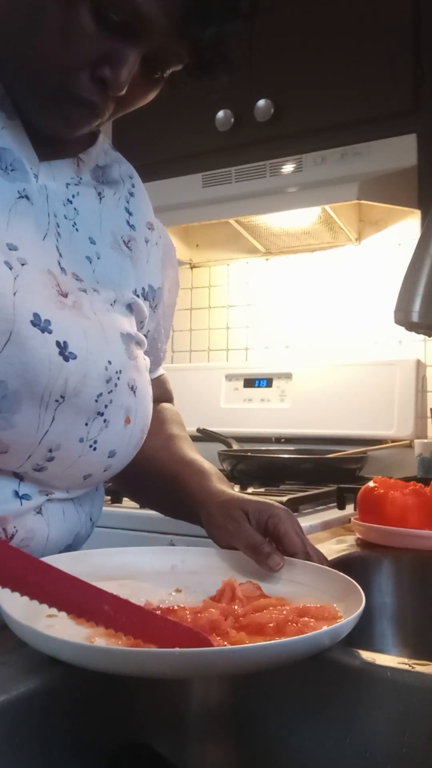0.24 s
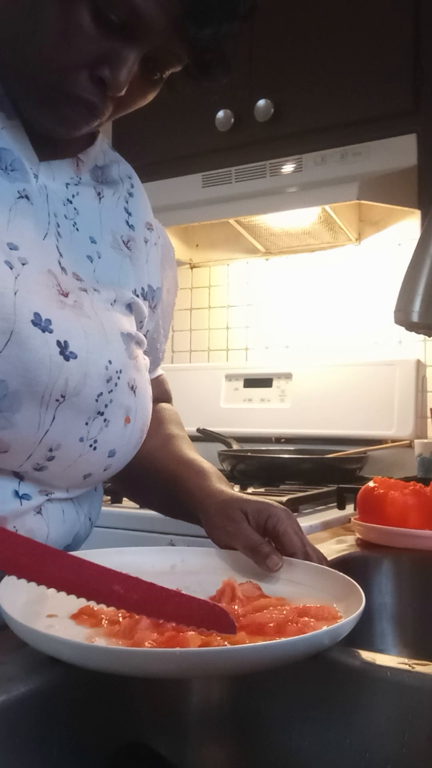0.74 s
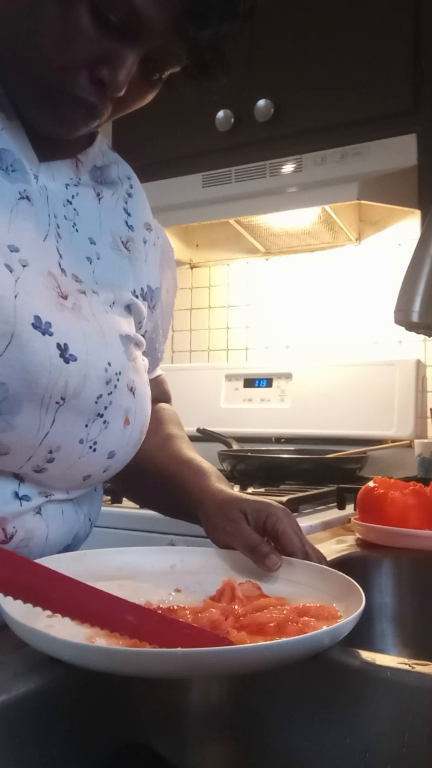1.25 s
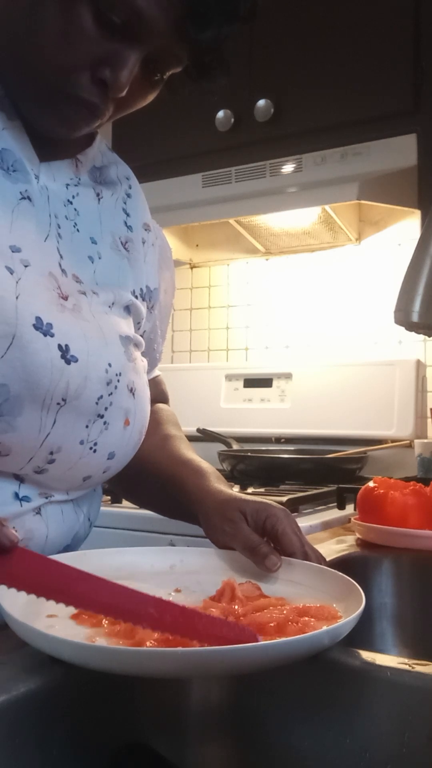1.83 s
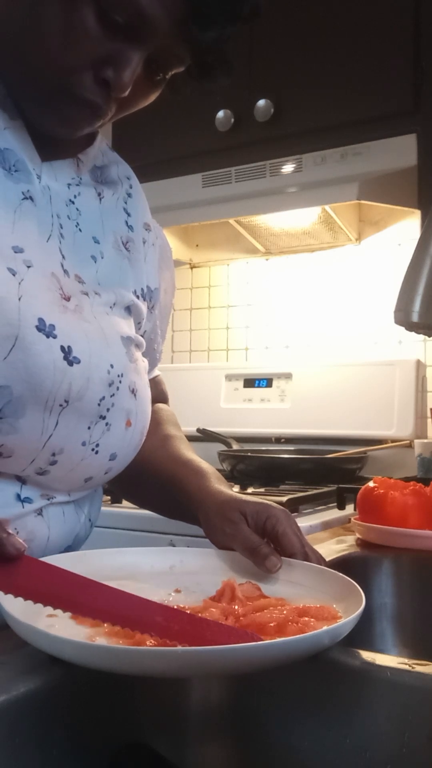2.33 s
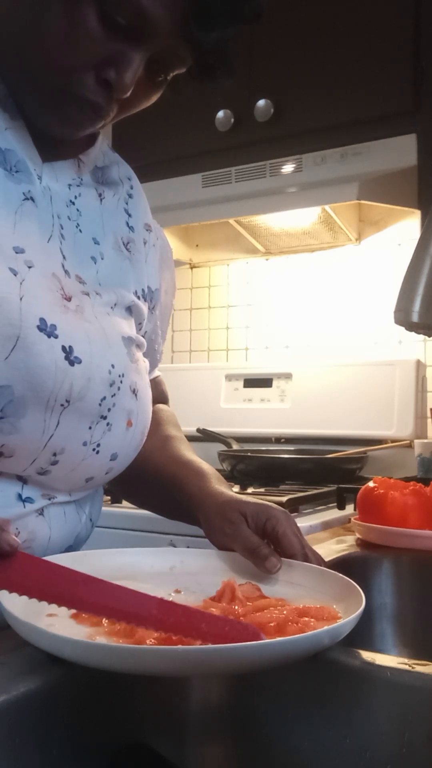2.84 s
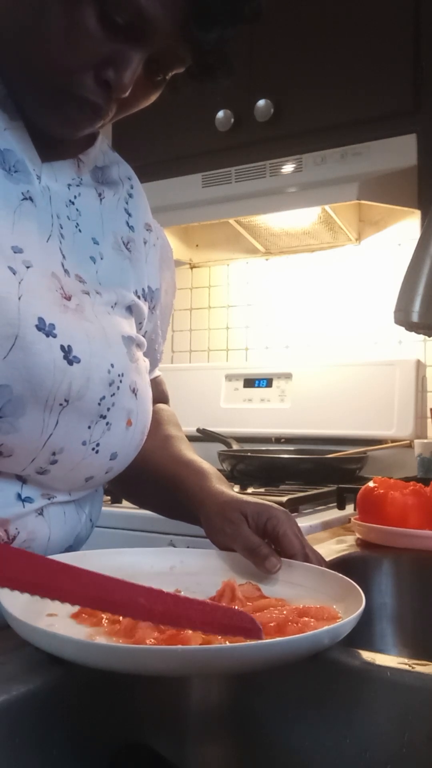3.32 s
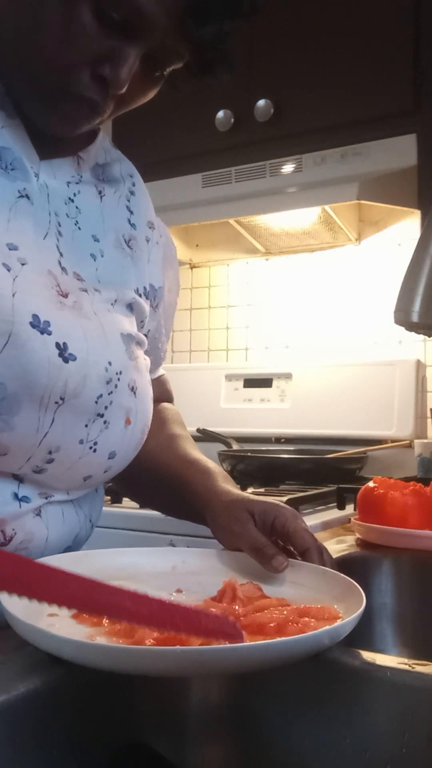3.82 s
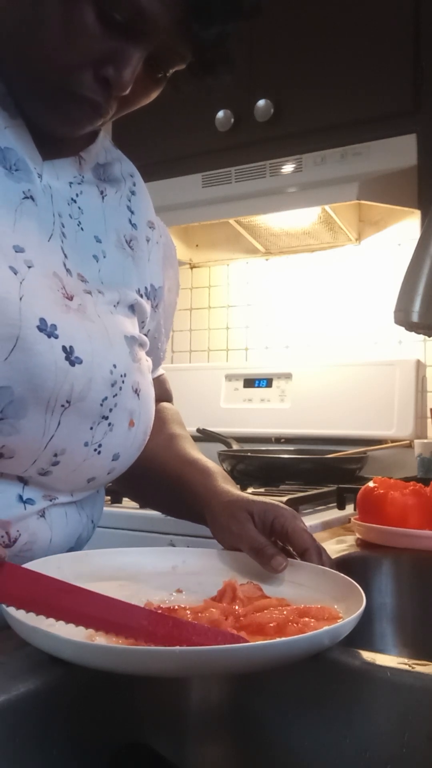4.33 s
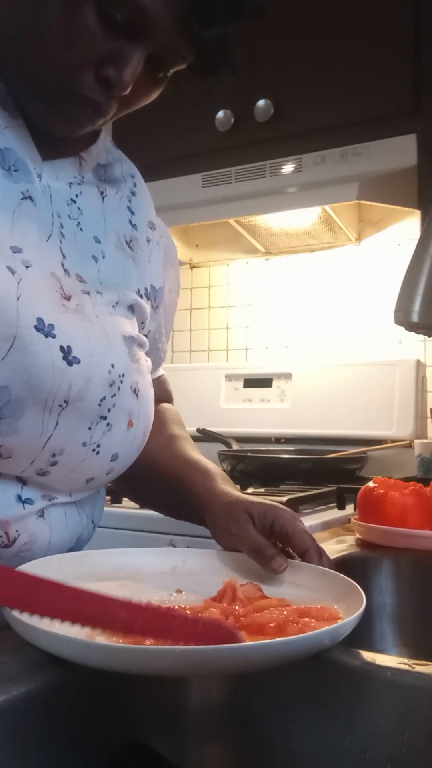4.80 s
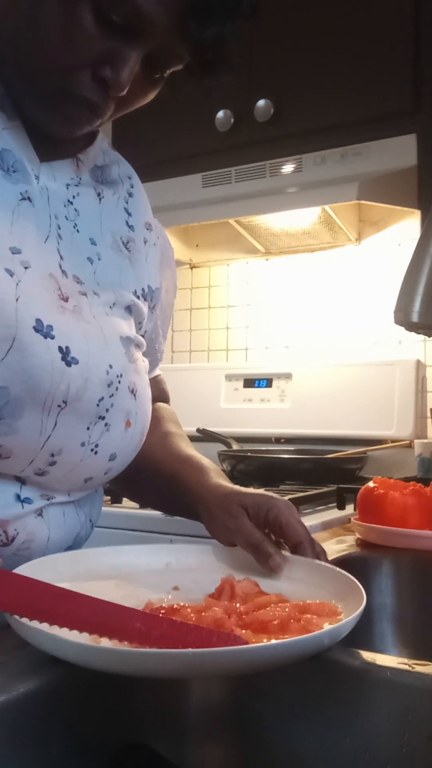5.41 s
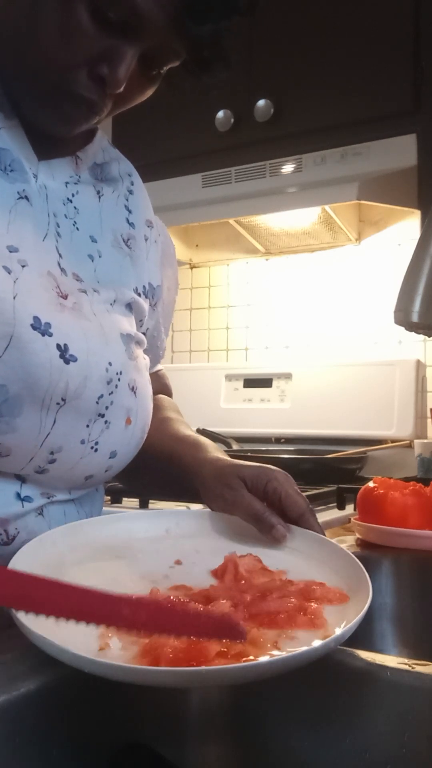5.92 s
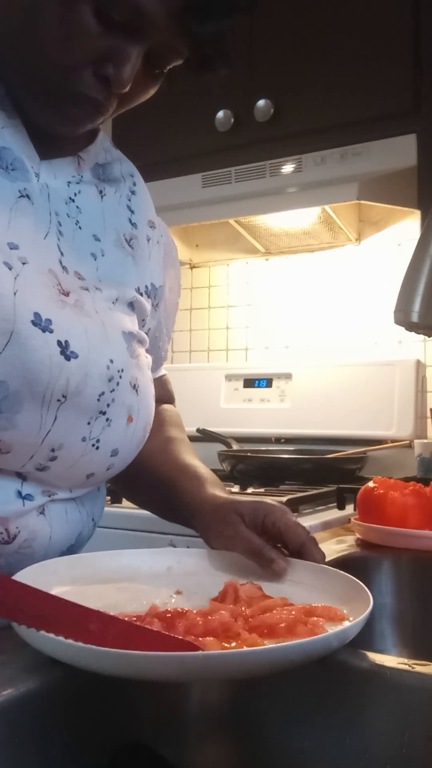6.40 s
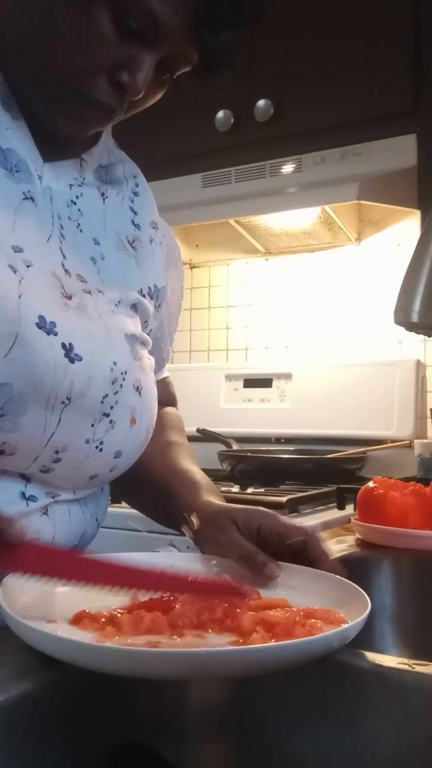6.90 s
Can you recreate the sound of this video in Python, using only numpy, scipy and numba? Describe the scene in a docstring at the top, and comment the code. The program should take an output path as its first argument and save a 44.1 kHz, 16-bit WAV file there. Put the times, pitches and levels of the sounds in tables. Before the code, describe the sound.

A serrated knife works through chopped tomato on a plate, heard close up in a quiet kitchen. In the first second it rubs softly, with small rough squeaks and groans on the glaze. The plate knocks lightly on the counter at about 1.2 and 2 seconds, and gritty, wet scrapes come from 1.6 to 2.5. After another knock near 3.1, the scraping becomes louder and nearly continuous from 3.3 to 6 seconds, with squelching pulp and sharp ticks of the teeth. More knocks fall in between, and brief squeaks come around 4.6 to 4.9. Stronger knocks at about 6.1, 6.5 and 6.9 seconds make the plate and counter rattle and ring briefly, followed by a last light scrape. Nearly everything is on the right; the covered left microphone gives little but faint hiss.

```python
"""Gritty, wet scraping, close up: a serrated knife pushes through chopped tomato on a plate.
The teeth catch, tick and squeak on the glaze while juice pops in the pulp. The plate knocks on the
kitchen counter so that both rattle and ring, and short pitched cracks sharpen some ticks and knocks.
The right microphone is open; the left one is covered and gets little but its own hiss and dull knocks."""
import sys
import numpy as np
from scipy import signal
from scipy.fft import rfft, irfft
from scipy.io import wavfile
from numba import njit

SR = 44100
rng = np.random.default_rng(int(sys.argv[2]) if len(sys.argv) > 2 else 0)


def pcm_store(signal):
    """Save signal as 16-bit PCM."""
    levels = np.round(np.clip(np.atleast_2d(signal), -1, 1) * 32767)
    wavfile.write(sys.argv[1], SR, levels.astype(np.int16).T)


N = 315315

# The plate knocking on the counter. Each row: start in seconds, boom in dB, then thud, ring and tick in
# dB above the boom, rattle length in seconds, thump in dB above the boom, boom and thud pitch in Hz.
KNOCKS = [(1.239, -36.5, -12.5, -4.5, -9, 0.12, -11, 740, 195),
          (2.046, -38, -12, -27, -27, 0.057, -17, 760, 235), (3.08, -37, -11, -8.5, -5, 0.07, -7, 450, 273),
          (4.244, -44, -19, -3, -29, 0.041, -5, 750, 196),
          (4.805, -38.5, -13.5, -22, -12, 0.12, 0, 450, 297),
          (5.341, -36.5, -34, -6, -4, 0.08, -22, 440, 232), (5.536, -32, -36, 1, 7.5, 0.011, 9, 513, 323),
          (6.1098, -30.5, -3, 4, 8.5, 0.085, 17, 390, 283),
          (6.501, -21.5, -5.5, -12.5, -18.5, 0.066, -6, 584, 189),
          (6.876, -21, -14, -2, -11, 0.054, 3, 580, 285)]
# Single teeth ticking on the glaze. Each row: start in seconds, level in dB, ring in dB above that.
TOOTH_TICKS = [(0.169, -51, -23), (0.378, -45, 15), (1.5938, -52, -26), (1.709, -24, -7), (2.453, -43, -11),
               (2.8496, -68, -8), (3.083, -56, 27.5), (3.2656, -46.5, 10), (3.3098, -21, -2),
               (3.38, -24, -11), (3.414, -21, -26), (3.449, -20, -25), (3.526, -24, -25), (3.608, -20, -12),
               (3.6705, -27, -25), (3.703, -30, -27), (3.717, -30, -27), (3.746, -37, -33),
               (3.751, -40, -23), (3.82, -37, -25), (3.836, -18, -13), (3.853, -21, -25), (3.897, -31, -25),
               (4.13, -25, -25), (4.266, -32, -29), (4.3344, -46, -27), (4.354, -21, -3.5),
               (4.401, -28, -25), (4.6927, -38, -23), (4.83, -39, 2), (4.905, -31, -23), (4.922, -25, -24),
               (4.935, -21, -25), (4.978, -33, -25), (5.183, -28, -20), (5.208, -24, -3), (5.244, -36, -27),
               (5.278, -35, -23), (5.31, -26, -25), (5.316, -24, -25), (5.438, -20.5, 1.5),
               (5.533, -27, -25), (5.611, -26, -25), (5.634, -22, -25), (5.7489, -22, -19), (5.9, -42, -35),
               (6.178, -34, -25), (6.209, -35, -25), (6.304, -43, -28), (6.312, -35, -30),
               (6.357, -29, -44), (6.637, -45, -5), (6.6704, -37, -13), (6.8114, -45, -12),
               (6.8795, -19, -2.5), (6.9547, -36, -20), (7.0044, -49, -8), (7.1043, -68, -41)]


def from_db(db):
    """Decibels to gain."""
    return 10 ** (np.asarray(db) / 20)


def rms_one(x):
    """Scale to rms 1."""
    return x / np.sqrt(np.mean(x ** 2) + 1e-20)


def cut(x, hz, kind, order):
    """Butterworth filter; kind names the part that passes."""
    return signal.sosfilt(signal.butter(order, hz, kind, fs=SR, output="sos"), x)


def band(x, low_hz, high_hz):
    """Gentle band-pass."""
    return cut(x, [low_hz, high_hz], "band", 2)


def colour(x, spectrum):
    """Minimum-phase filter of unit energy that follows rows of Hz and dB."""
    hz, level_db = np.transpose(spectrum)
    size = 2 ** 13
    grid = np.maximum(np.arange(size // 2 + 1), 1) * SR / size
    curve_db = np.interp(np.log(grid), np.log(hz), level_db)
    cepstrum = irfft(np.log(from_db(curve_db)))
    cepstrum[1:size // 2] *= 2
    cepstrum[size // 2 + 1:] = 0
    response = irfft(np.exp(rfft(cepstrum)))
    return signal.fftconvolve(x, response / np.sqrt(np.sum(response ** 2)))[:N]


def ring(force, hz, t60):
    """One mode: a unit click sets off a dying sine of height 1."""
    r, w = from_db(-60 / (max(t60, .01) * SR)), 2 * np.pi * hz / SR
    return signal.lfilter([0, np.sin(w)], [1, -2 * r * np.cos(w), r * r], force + 1e-18)


@njit
def sweep(x, hz, width_hz):
    """Resonance of gain 1 whose centre moves."""
    y, r = np.zeros(len(x)), np.exp(-np.pi * width_hz / SR)
    for i in range(2, len(x)):
        feedback = 2 * r * np.cos(2 * np.pi * hz[i] / SR) * y[i - 1] - r * r * y[i - 2]
        y[i] = (1 - r * r) / 2 * (x[i] - x[i - 2]) + feedback
    return y


def drift(hz):
    """Smooth random wander of rms 1."""
    r = np.exp(-2 * np.pi * hz / SR)
    return rms_one(signal.lfilter([1], [1, -2 * r, r * r], rng.standard_normal(N + SR))[SR:])


def grains(per_s, spread_db):
    """Random clicks of uneven size and sign."""
    sizes = from_db(spread_db * np.minimum(rng.exponential(1, N), 4)) * rng.choice([-1, 1], N)
    return rms_one(sizes * (rng.random(N) < per_s / SR))


def flicker(x, low_hz, depth_db, bands):
    """Quarter-octave bands from low_hz up each swell and fade on their own."""
    edges = low_hz * 2 ** (np.arange(bands + 1) / 4)
    return x + sum(band(x, low, high) * (from_db(depth_db * drift(21.5)) - 1)
                   for low, high in zip(edges, edges[1:]))


def room_tone():
    """A faint, low bed of noise that wavers slowly."""
    # The quiet kitchen's spectrum. Each row: frequency in Hz, level in dB.
    spectrum = [(18, -49), (30, 8), (127, 4.5), (199, -4), (258, 2.5), (403, -14.5), (538, -2.5),
                (614, -9.5), (718, -19), (777, -8.5), (841, -7), (1500, -22.5), (6020, -20.5), (8250, -32),
                (15900, -49)]
    return from_db(-72.5) * colour(rng.standard_normal(N), spectrum) * from_db(0.69 * drift(0.86))


def covered_hiss():
    """The covered microphone's own steady noise."""
    # The colour of the hiss. Each row: frequency in Hz, level in dB.
    spectrum = [(20, -30), (45, -0.5), (70, -1.5), (130, -1.5), (250, -7), (500, -10.5), (1000, -15),
                (3000, -17.5), (6200, -19.5), (8000, -31), (10500, -31), (13600, -27.5), (15000, -22.5),
                (16000, -25)]
    return from_db(-80) * colour(rng.standard_normal(N), spectrum)


def tooth_friction():
    """Teeth catch in clumps over a smooth wet slide; every few ms others sing at another pitch."""
    smooth_share = .8
    catches = grains(per_s=2500 * from_db(1.5 * drift(40)), spread_db=3.5)
    pitches_hz = 1500 * 2 ** rng.uniform(0, 2.93, N)
    tooth = np.cumsum(rng.random(N) < 150 / SR)
    singing = rms_one(sweep(catches, pitches_hz[tooth], width_hz=880))
    slide = np.sqrt(smooth_share) * rng.standard_normal(N)
    friction = slide + np.sqrt(1 - smooth_share) * catches + from_db(-13.5) * singing
    return friction * from_db(1.1 * drift(60))


def blade_strokes():
    """Each push swells, holds and dies as the blade lifts. Gives four gain curves and two pitch curves."""
    # Pushes of the blade. Each row: time of full bite, rise and hold in seconds, grit in dB, sag over
    # the hold in dB, then plate ring, counter boom and sheen in dB above the grit, squelch pitch and
    # rubbing pitch in Hz.
    pushes = [ (0.005, 0.012, 0.2, -73, 7, -2.5, -25.5, 4, 4800, 396),
              (0.17, 0.015, 0.042, -61, 18, -20, -6, -38, 3470, 473),
              (0.308, 0.12, 0.06, -78.5, -8.5, -10, 20.5, 12, 4500, 300),
              (0.389, 0.028, 0.12, -56, 5, 7, -13, 9.5, 3500, 575),
              (0.565, 0.12, 0.047, -72, -1, -10, 17, 19, 5340, 516),
              (0.66, 0.035, 0.1, -88, -12, -17, 8, -2, 4880, 507),
              (0.74, 0.027, 0.051, -59, -5.5, -20, 1.5, -15, 4030, 530),
              (1.252, 0.021, 0.018, -57, -5.5, 6.5, 4, -20, 4170, 455),
              (1.45, 0.2, 0.074, -78.5, -3, -18, 11.5, -10, 5700, 455),
              (1.595, 0.0097, 0.084, -43, 0, -11.5, -10, 7.5, 4950, 542),
              (1.726, 0.038, 0.11, -38.5, 7.5, 1, -7, 11.5, 4850, 590),
              (1.867, 0.029, 0.035, -49, 0, 0, -33, 13.5, 5170, 810),
              (1.969, 0.056, 0.066, -43, 16.5, -3.5, -28, 7.5, 4960, 780),
              (2.094, 0.083, 0.097, -48, -5, -3, -3.5, -3, 5350, 534),
              (2.216, 0.041, 0.1, -47.5, 9, 3, -24, 4.5, 3970, 582),
              (2.307, 0.018, 0.056, -49, 7.5, -1, -17, -49, 3480, 664),
              (2.452, 0.0043, 0.15, -59.5, 16.5, -23, 0, -19, 2970, 583),
              (2.616, 0.038, 0.057, -76.5, 12, -15, 17, 5, 3010, 587),
              (2.852, 0.0079, 0.05, -69, 9, 8.5, -19, 10.5, 3230, 640),
              (3.267, 0.024, 0.016, -72, -5.5, 7, 29.5, -3, 4960, 544),
              (3.267, 0.003, 0.02, -53.5, 1, 4, -12, -3, 5100, 534),
              (3.32, 0.024, 0.029, -36.5, -3, -1, -5.5, 7, 4820, 522),
              (3.38, 0.012, 0.09, -31, -3, -8.5, -16.5, 5, 4710, 530),
              (3.499, 0.043, 0.19, -36, 5, -5, -14.5, 8, 4480, 557),
              (3.703, 0.015, 0.18, -33.5, 5, -24, -53, 8.5, 5260, 680),
              (3.884, 0.0255, 0.071, -39, -6, -5.5, -46, 4.5, 4450, 690),
              (4.019, 0.11, 0.14, -38.5, 3, -1, -24, 5, 4700, 660),
              (4.248, 0.098, .02, -49, 7, -7, -19, 4, 4750, 600),
              (4.264, 0.004, 0.14, -35.5, 1, -14, -17, 2.5, 4760, 545),
              (4.426, 0.09, 0.062, -39.5, 1.5, -1, -9, 1, 4730, 768),
              (4.528, 0.067, 0.1, -42, 8, -1, -15, 4.5, 5000, 684),
              (4.691, 0.0042, 0.068, -53.5, 8, -25, 3.5, -7, 4280, 490),
              (4.858, 0.12, 0.017, -60.5, 18, 8, 17.5, 5, 4530, 545),
              (4.951, 0.084, 0.09, -33.5, 1, -7, -17, 9, 5730, 550),
              (5.077, 0.052, 0.1, -43.5, 14.5, 7.5, -4, 12.5, 4080, 700),
              (5.153, .02, 0.028, -42.5, -3.5, -3, -20, 8, 2300, 770),
              (5.188, 0.0059, 0.019, -36, -1, -11, -19, 2, 4500, 770),
              (5.204, 0.0032, 0.15, -31, 8, -6, -28, 2.5, 4100, 510),
              (5.363, 0.011, 0.043, -35, 10, -17, -25, 11.5, 6030, 480),
              (5.389, 0.017, 0.11, -44, -5.5, 2.5, 0.5, -11, 4900, 487),
              (5.509, 0.12, 0.056, -43, -9, 4.5, -16, 7.5, 3940, 543),
              (5.61, 0.037, 0.078, -34, 2, 0.5, -8, 0.5, 4500, 576),
              (5.75, 0.036, 0.088, -44.5, -5.5, 2, -1.5, 3.5, 3860, 785),
              (5.899, 0.0051, 0.11, -46, 11, -38, -32, 1, 5570, 705),
              (5.963, 0.013, 0.3, -52.5, 2.5, -11, -9.5, 3, 3600, 757),
              (6.3084, 0.004, 0.048, -45.5, 15, -7, -9, 13.5, 5440, 352),
              (6.358, .002, 0.15, -44, 25, -15, -41, 0, 4530, 550),
              (6.623, 0.035, 0.074, -59, 22, -25, 15.5, -1, 4500, 534),
              (6.666, 0.0045, 0.14, -60, 24, -2, -2, 3, 3500, 487),
              (6.815, 0.0018, 0.052, -57.5, 7, -25, -14, 5.5, 5130, 333),
              (6.943, 0.029, 0.017, -37, 18, 9, -1, -11, 2740, 457),
              (6.96, 0.024, 0.016, -52, 19, -20, 17, 26.5, 2900, 466),
              (6.998, 0.062, 0.061, -55.5, 19, -22, 21.5, 15, 4770, 443),
              (7.1, 0.097, 0.082, -66, 5, -7, 3, 7, 5200, 390)]
    touch_s, release_db_per_s = .015, 456
    t, power, pitch = np.arange(N) / SR, np.zeros((4, N)), np.zeros((2, N))
    for s, rise_s, hold_s, grit_db, sag_db, ring_db, boom_db, sheen_db, squelch_hz, rub_hz in pushes:
        rise_s = max(rise_s, .002)
        span = slice(max(round((s - rise_s - touch_s) * SR), 0), round((s + hold_s + .2) * SR))
        push_db = np.interp(t[span] - s, [-rise_s - touch_s, -rise_s, 0, hold_s, hold_s + 1],
                            [-34.5, -11.5, 0, -sag_db, -sag_db - release_db_per_s])
        layer_db = grit_db + np.array([[0], [ring_db], [boom_db], [sheen_db]])
        power[:, span] += from_db(layer_db + push_db) ** 2
        pitch[:, max(round((s - rise_s / 2) * SR), 0):] = [[squelch_hz], [rub_hz]]
    wander_octaves = np.array([0.23 * drift(4.6), .06 * drift(9.2)])
    return np.sqrt(power), pitch * 2 ** wander_octaves


def squelch(hz):
    """Pockets of juice burst and ring for a few cycles."""
    return rms_one(sweep(grains(per_s=440, spread_db=1.8), hz, width_hz=350))


def scrape(grit, sheen, crackle):
    """Steel on glaze: flickering grit with a sheen on top, plus the bright edge of ticks and knocks."""
    # The colour of the scrape. Each row: frequency in Hz, level in dB.
    spectrum = [(530, -33), (900, -16.5), (1040, -9.5), (1340, -11), (2330, -6.5), (2850, -7), (3180, -4),
                (3460, -4), (6540, 0.5), (8210, -18), (13600, -26), (15000, -25.5), (15900, -6.5)]
    crossover_hz = 7390
    lower = flicker(cut(grit, crossover_hz, "low", 4), low_hz=1522, depth_db=2.5, bands=9)
    shimmer = sheen * from_db(2.15 * drift(33.3))
    upper = flicker(cut(shimmer, crossover_hz, "high", 4), low_hz=7200, depth_db=3, bands=4)
    edge = from_db(-11) * blows(6000) * crackle + tooth_snaps()
    return colour(lower + upper + edge, spectrum)


def plate(rub_ring, rub_boom):
    """Plate and counter ring together, rubbed by the blade and rattled by the blows."""
    # Their modes. Each row: pitch in Hz, level in dB, time to die by 60 dB in seconds.
    modes = [(75.1, -17, 0.53), (107, -11, 0.17), (140, -18.5, 0.041), (169.6, -8, 0.13),
             (205.1, 2.5, 0.24), (276, -2.5, 0.17), (308, -1, 0.049), (390, -11.5, 0.06),
             (462, -2.5, 0.084), (566.4, 4, 0.059), (669, -1.5, 0.055), (703, -5, 0.0068), (780, -5, 0.11),
             (855, -14.5, 0.039), (950, -3, 0.0093), (1050, -4.5, 0.036), (1136, -2.5, 0.013),
             (1261, -9.5, 0.094), (1415, -9, 0.18), (1746, 2.5, 0.0054), (2010, -7, 0.01),
             (2127, -8, 0.058), (2345, -4, 0.048), (2640, -1.5, 0.021), (2950, -6, 0.04), (3204, 4, 0.019),
             (3600, -5.5, 0.015), (3960, 7.5, 0.01), (4500, 1, 0.028), (5340, 7, 0.011), (6200, 3, 0.011)]
    pressed_share = 0.68  # ringing time left under the pressing blade
    rubs = [from_db(-42.5) * rub_boom, from_db(-46) * rub_boom, from_db(-35.5) * rub_ring]
    rubs = band(rubs, 297, 3560)
    out, rattle = np.zeros(N), grains(per_s=1100, spread_db=3.3)
    for hz, level_db, t60 in modes:
        register = np.searchsorted([330, 1000], hz)  # thud, boom, ring
        struck = from_db([-36, -40, -43][register]) * blows(hz) * np.roll(rattle, rng.integers(N))
        struck += (register == 2) * clacks()
        out += from_db(level_db) * ring(struck, hz, t60)
        out += from_db(level_db) * ring(rubs[register], hz, t60 * pressed_share)
    return out


def damped_plate(rub_ring, rub_boom, crackle):
    """Pulp and hand damp the plate, smearing part of its ring into two broad bands."""
    bright = from_db(-2.5) * rub_ring + from_db(-8) * blows(2000) * crackle
    hollow = from_db(-1.5) * rub_boom + from_db(0.5) * blows(460) * crackle
    return band(bright, 780, 3050) + band(hollow, 370, 1147)


def dry_rubs():
    """Rubs on bare glaze swell and fade, each making the plate sing around a favoured pitch."""
    # The rubs. Each row: start and length in seconds, attack as a share of the length, level in dB,
    # favoured pitch in Hz, fall-off around it in dB per octave.
    rubs = [(0.157, 0.12, 0.097, -55, 3600, 14.5), (0.247, .075, 0.27, -44.5, 290, 22),
            (0.358, 0.17, 0.23, -41, 800, 4), (0.373, 0.16, 0.4, -52.5, 455, 30),
            (0.479, 0.22, 0.098, -51, 563, 53), (0.641, 0.19, 0.66, -48, 545, 46),
            (0.718, 0.054, 0.24, -46.5, 770, 40), (0.721, 0.1, 0.35, -53, 2540, 4),
            (2.446, 0.16, 0.023, -49.5, 2950, 53), (2.448, 0.043, 0.051, -54.5, 1300, 40),
            (4.77, .16, 0.44, -44, 497, 26), (5.206, 0.047, 0.18, -29.5, 3680, 18),
            (5.78, .09, 0.32, -50, 780, 35), (5.901, 0.04, .25, -41.5, 4900, 30),
            (5.974, 0.053, 0.21, -39, 1700, 32), (5.979, 0.047, 0.25, -40, 3160, 31),
            (6.36, .06, 0.083, -45, 4150, 30), (6.887, 0.09, 0.062, -36, 2300, 6.5)]
    # Where the rubbed plate sings. Each row: centre and width in Hz, level in dB.
    glaze_bands = [(243, 40, -9.5), (290, 50, -13), (455, 13, -1), (550, 19, -8.5), (770, 20, -11.5),
                   (800, 12, -7), (947, 26, -14), (1180, 21, -9.5), (1300, 54, -12), (1674, 120, -10.5),
                   (2064, 22, -16.5), (2300, 22, -11.5), (2700, 45, -15.5), (2900, 64, -10.5),
                   (3160, 77, -9.5), (3530, 41, -12.5), (3840, 63, -10.5), (4110, 46, -10.5),
                   (4500, 45, -12.5), (4900, 31, -5.5), (5260, 40, -8), (5730, 70, -7), (5910, 35, -7),
                   (6100, 32, -16), (6960, 51, -12)]
    out = np.zeros(N)
    for hz, width_hz, band_db in glaze_bands:
        force = np.zeros(N + SR)
        for s, length_s, attack, level_db, favoured_hz, fall_db in rubs:
            progress = np.linspace(0, 1, round(length_s * SR))
            swell = np.interp(progress, [0, attack, 1], [0, 1, 0])
            gain = from_db(level_db + band_db - abs(fall_db * np.log2(hz / favoured_hz)))
            force[round(s * SR):][:len(swell)] += gain * swell * rng.standard_normal(len(swell))
        out += sweep(force[:N], np.full(N, float(hz)), width_hz) * np.sqrt(SR / width_hz / np.pi)
    return out


def tooth_snaps():
    """Each tick of a tooth opens with one hard, bright snap."""
    out = np.zeros(N)
    for s, tick_db, _ in TOOTH_TICKS:
        out[round(s * SR)] = from_db(tick_db + 4)
    return cut(out, 3500, "high", 2)


def blows(hz):
    """Envelope of the blows at one pitch: knocks hit and rattle away; teeth add spikes above 1 kHz."""
    hit_s, tooth_s, fall_db_per_octave = 0.013, .004, 3.5
    strength, age = np.zeros(N + SR), np.arange(SR // 4) / SR
    hit = from_db(-0.5) * np.exp(-age / hit_s)
    register = np.searchsorted([330, 1000, 4000], hz)  # thud, boom, ring, tick
    rise_s = 0.0029 if register == 0 else 0.0049
    rise = 1 - np.exp(-age / rise_s)
    for s, boom_db, thud_db, ring_db, tick_db, rattle_s, _, boom_hz, thud_hz in KNOCKS:
        # where the plate is struck decides which low modes are favoured
        octaves_off = abs(np.log2(hz / [thud_hz, boom_hz, hz, hz][register]))
        level_db = boom_db + [thud_db, 0, ring_db, tick_db][register] - fall_db_per_octave * octaves_off
        rattle = rise * np.exp(-(age / rattle_s) ** 2)
        strength[round(s * SR):][:len(age)] += from_db(level_db) * (hit + rattle)
    if register >= 2:
        for s, tick_db, ring_db in TOOTH_TICKS:
            level_db = tick_db + (ring_db + 0.5 if register == 2 else 5)
            strength[round(s * SR):][:len(age)] += from_db(level_db) * np.exp(-age / tooth_s)
    return strength[:N]


def squeaks():
    """Blade and plate slip with rough squeaks and groans: friction noise in a narrow gliding band."""
    # The slips. Each row: start and length in seconds, level in dB, first and last pitch in Hz.
    slips = [(0.248, .06, -56, 259, 298), (0.57, 0.074, -57, 440, 540), (0.64, .07, -62, 583, 480),
             (0.698, 0.066, -55.5, 390, 394), (0.76, 0.061, -59, 2150, 2100),
             (4.577, 0.081, -50.5, 1740, 1940), (4.723, 0.044, -57, 1050, 900),
             (4.788, 0.13, -51.5, 963, 1160)]
    out, friction = np.zeros(N), rng.standard_normal(N)
    for s, length_s, level_db, from_hz, to_hz in slips:
        progress = np.linspace(0, 1, round(length_s * SR))
        span = slice(round(s * SR), round(s * SR) + len(progress))
        tone = sweep(friction[span], from_hz + (to_hz - from_hz) * progress, width_hz=.04 * from_hz)
        out[span] += from_db(level_db - 3) * np.sin(np.pi * progress) * rms_one(tone)
    return out


def clacks():
    """The hard edge of each knock: one click of random strength to drive an upper mode."""
    out = np.zeros(N)
    for s, boom_db, _, ring_db, *_ in KNOCKS:
        out[round(s * SR)] = from_db(boom_db + ring_db - 16) * rng.standard_normal()
    return out


def thumps():
    """The soft first contact of each knock: a few swelling and dying cycles at its boom pitch."""
    swell_s = 0.0014
    out, age = np.zeros(N + SR), np.arange(SR // 10) / SR
    swell = age / swell_s * np.exp(1 - age / swell_s)
    for s, boom_db, *_, thump_db, boom_hz, _ in KNOCKS:
        thump = swell * np.sin(2 * np.pi * boom_hz * age)
        out[round(s * SR):][:len(age)] += from_db(boom_db + thump_db - 6) * thump
    return band(out[:N], 220, 2800)


def after_ring():
    """Notes of plate and counter linger after a knock, wavering and fading ever faster."""
    # The lingering notes. Each row: pitch in Hz, time to die by 60 dB and swell time in seconds.
    notes = [(130.6, 0.52, 0.041), (202.95, 0.44, 0.028), (239.4, 0.26, 0.011), (266, 0.56, 0.0078),
             (456, 0.37, 0.0072), (545, 0.19, 0.008), (571, 0.25, 0.0097), (600, 0.2, 0.0022),
             (660, 0.18, 0.0035), (763, 0.34, 0.0019), (794, 0.27, 0.0019), (860, 0.072, 0.0017),
             (1064, 0.071, 0.004), (1205, 0.23, 0.0041)]
    # Where the plate is struck sets each note's strength. Each row: start in seconds, factor on the
    # ringing time, then the level of each note in dB.
    strikes = [(1.243, 0.81, -47, -49, -54, -55, -60, -68, -57, -53, -60, -47, -41.5, -71, -70, -54),
               (2.05, 1.4, -72, -55, -54.5, -73, -53, -51.5, -54, -54, -66, -56, -48, -67, -68, -59),
               (3.082, 0.79, -65, -42.5, -59, -56, -41, -61, -48.5, -56, -53, -48, -59, -37, -56, -49),
               (4.245, 0.79, -69, -40.5, -64, -56, -47, -64, -41.5, -58, -49, -49, -50, -43, -40, -52),
               (4.81, 0.36, -46, -56, -58, -51, -49, -56, -40, -63, -54, -68, -69, -58, -56, -63),
               (5.348, 1.15, -62.5, -47.5, -58, -57, -40, -62, -60, -61, -58, -51, -41, -61, -56, -47),
               (5.54, 0.34, -66, -70, -62, -49, -35, -48, -50, -44, -48, -52, -46, -54, -57, -47),
               (6.11, 1.03, -61, -40.5, -38, -49, -46, -41, -52, -60, -58, -39, -66, -64, -60, -57),
               (6.503, 1.2, -48, -35, -44, -46, -40, -36, -34, -35, -47, -35, -46, -44, -53, -50),
               (6.88, 1.27, -55, -35, -52, -43, -32.5, -40, -48, -36, -44, -38, -44, -51, -42, -43)]
    waver_db, waver_turns, fade_bend = 3, .12, 1.166
    out, age = np.zeros(N + SR), np.arange(SR // 2) / SR
    for k, (hz, t60, swell_s) in enumerate(notes):
        note, phase_drift = np.zeros(N + SR), np.pad(waver_turns * drift(14), (0, SR))
        swell = 1 - np.exp(-(age / swell_s) ** 2)
        for s, stretch, *levels_db in strikes:
            span = slice(round(s * SR), round(s * SR) + len(age))
            fade = from_db(levels_db[k] - 60 * (age / (t60 * stretch)) ** fade_bend)
            turns = hz * age + rng.random() + phase_drift[span]
            note[span] += swell * fade * np.sin(2 * np.pi * turns)
        out[:N] += note[:N] * from_db(waver_db * drift(23.6))
    return out[:N]


def pitched_cracks():
    """Short pitched cracks: sharp clicks on ticks and knocks, and the plate's low bounces."""
    # The cracks. Each row: start in seconds, level in dB, pitch in Hz.
    cracks = [(3.0811, -33.5, 2570), (3.081, -47, 5130), (3.745, -21.5, 5900), (4.267, -29, 5300),
              (4.351, -28, 5430), (4.922, -21.5, 5900), (5.903, -28.5, 6560), (6.1094, -30, 4500),
              (6.356, -40, 5580), (6.521, -21, 634), (6.879, -25.5, 2350), (6.88, -25, 4620),
              (6.885, -21, 650)]
    out, click = np.zeros(N + SR), signal.unit_impulse(SR // 10)
    for s, level_db, hz in cracks:
        out[round(s * SR):][:len(click)] += from_db(level_db) * ring(click, hz, t60=0.018)
    return out[:N]


def kitchen(x):
    """A short, dense tail of echoes from tiles and steel."""
    t60_s, onset_s, wall_cut_hz = 0.14, 0.0019, 2400
    age = np.arange(SR // 2) / SR
    pole = np.exp(-2 * np.pi * wall_cut_hz / SR)
    tail = signal.lfilter([1], [1, -pole], rng.standard_normal(len(age)))
    tail *= from_db(-60 * age / t60_s) * np.minimum(age / onset_s, 1)
    return signal.fftconvolve(x, tail / np.sqrt(np.sum(tail ** 2)))[:N]


def scene():
    """Left: the covered microphone, with only the plate's muffled echo over hiss. Right: the open one."""
    gains, (squelch_hz, rub_hz) = blade_strokes()
    grit, rub_ring, rub_boom, sheen = gains * tooth_friction()
    pulp = from_db(-11) * gains[0] * squelch(squelch_hz)  # follows the level of the grit
    rub_tone = from_db(16) * sweep(rub_boom, rub_hz, width_hz=19.8)
    body = plate(rub_ring, rub_boom)
    crackle = grains(per_s=4500, spread_db=0.27)
    near = from_db(-3) * scrape(grit, sheen, crackle) + pulp + rub_tone
    near += body + damped_plate(rub_ring, rub_boom, crackle)
    near += pitched_cracks() + squeaks() + after_ring() + dry_rubs() + thumps()
    right = from_db(5.5) * (near + room_tone() + from_db(-14) * kitchen(near))
    muffled = cut(kitchen(body + after_ring()), 900, "low", 2)
    left = from_db(-42) * muffled + covered_hiss()
    return np.array([left, right])


def record(dry):
    """Small microphones lose the deep bass; the top is cut steeply."""
    thin = cut(dry, 62, "high", 4)
    return signal.sosfilt(signal.cheby2(20, 80, 16100, fs=SR, output="sos"), thin)


dry = scene()
out = record(dry)
pcm_store(out)
```